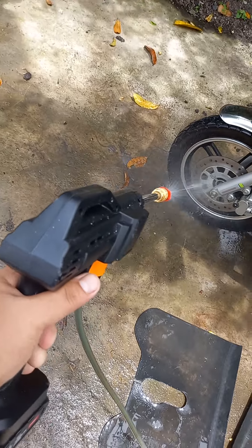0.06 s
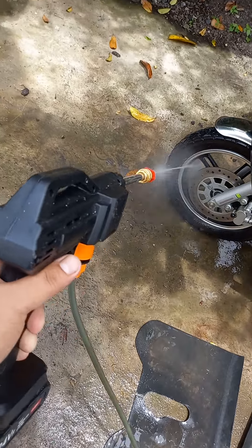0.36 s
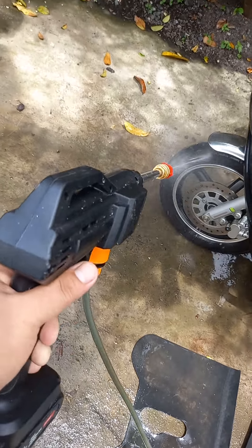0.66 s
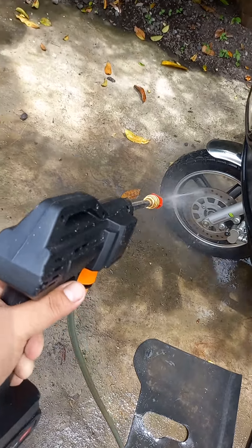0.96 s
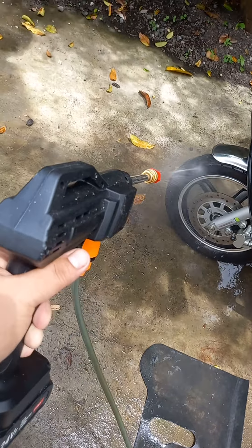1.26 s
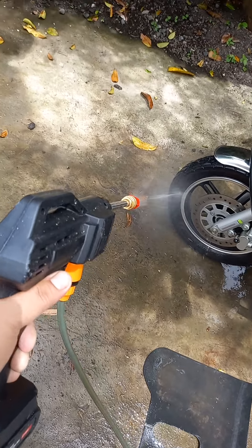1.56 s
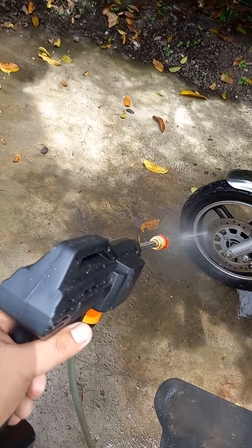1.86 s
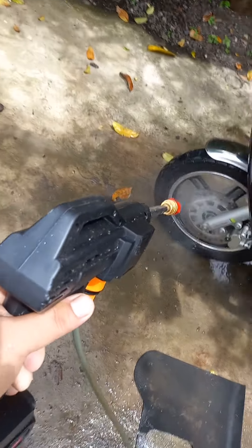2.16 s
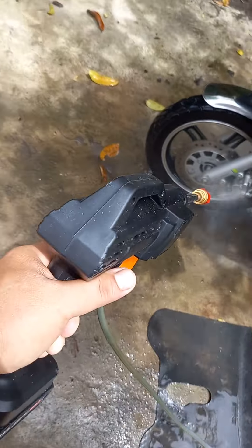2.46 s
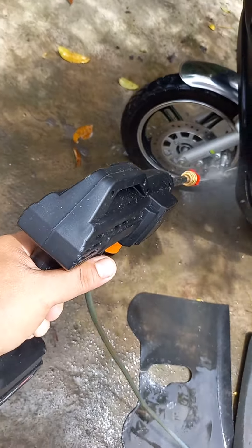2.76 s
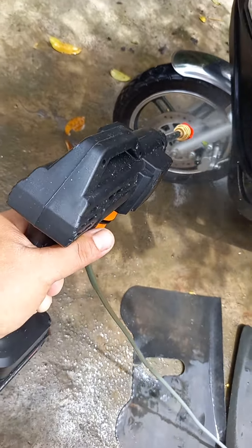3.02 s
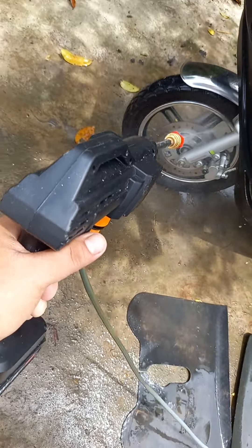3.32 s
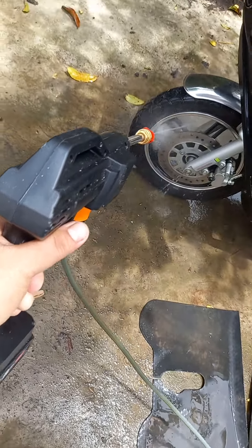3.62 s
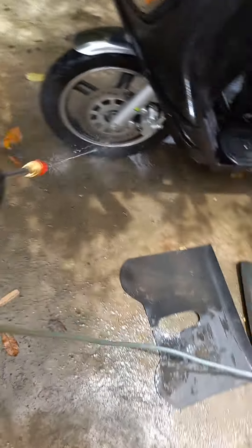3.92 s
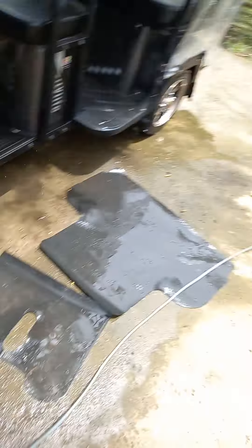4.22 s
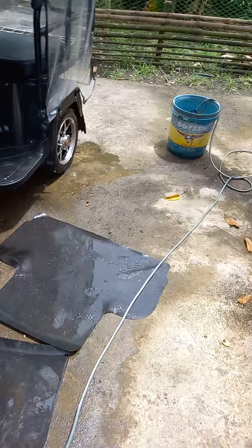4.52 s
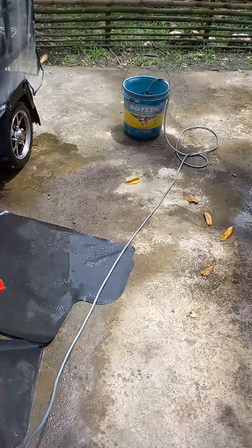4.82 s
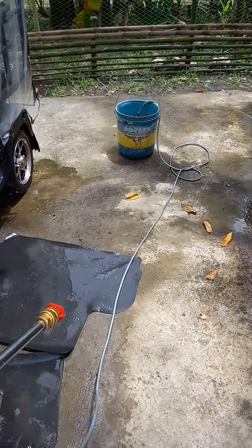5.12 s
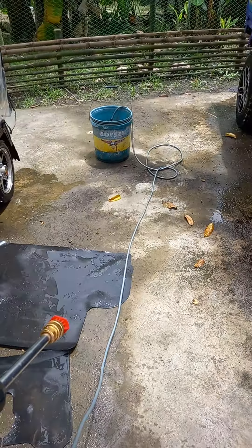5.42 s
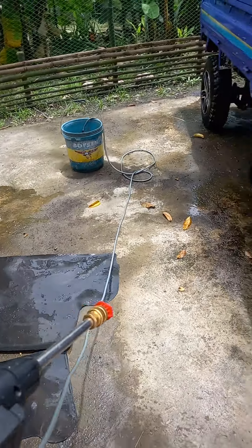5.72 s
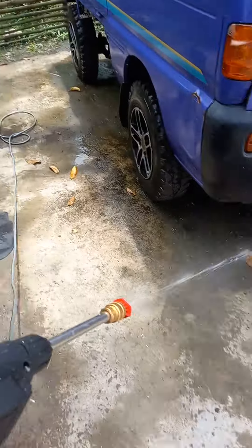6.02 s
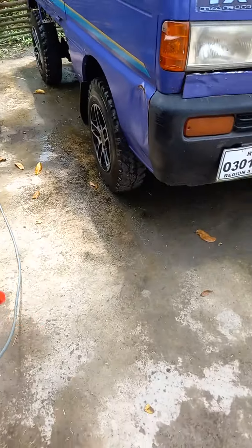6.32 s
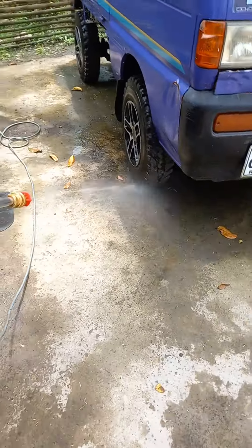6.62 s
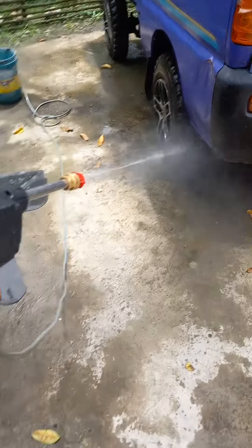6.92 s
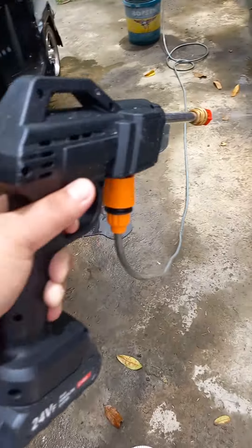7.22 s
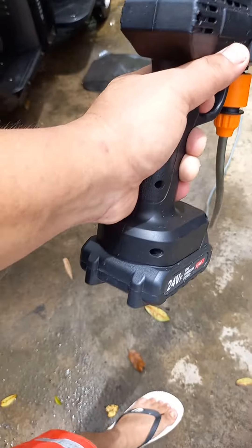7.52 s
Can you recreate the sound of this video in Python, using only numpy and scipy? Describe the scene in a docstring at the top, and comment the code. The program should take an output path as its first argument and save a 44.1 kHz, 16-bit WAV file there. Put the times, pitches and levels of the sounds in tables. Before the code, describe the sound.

A hand-held pressure washer buzzes and sprays a wheel, stops for a few scuffing steps, then restarts with a short burst and a longer one.

```python
"""A concrete yard, a stereo phone microphone close to a hand-held cordless pressure washer. First one long
pull rinses a wheel: the piston knocks the plastic housing at both ends of each crank turn, thumps the pump
head and rings a valve; the jet hisses in surges and air buffets the microphone. Near 4 s the gun runs down,
and hose and soles scrape over the wet ground to the right. Near 6 s, held another way, it starts again: a
short pull, then a long one, in which its motor vents turn to face the microphone."""
import sys
import numpy as np
from scipy import signal
from scipy.fft import rfft, irfft
from scipy.io import wavfile
from scipy.ndimage import uniform_filter1d

SR = 44100
rng = np.random.default_rng(int(sys.argv[2]) if len(sys.argv) > 2 else 0)


def to_wav(sig):
    """Store sig (one row per channel, or 1-D mono) as 16-bit WAV at the path in sys.argv[1].

    Samples outside -1..1 are clipped; the rate is SR.
    """
    pcm = np.clip(np.atleast_2d(sig), -1, 1) * 32767
    pcm = np.round(pcm).astype(np.int16)
    wavfile.write(sys.argv[1], SR, pcm.T)  # frames by channels


N = 333837
T = np.arange(N) / SR
FREQ = np.maximum(np.arange(2049) * SR / 4096, 1)

# Levels are relative, ahead of the gains in the functions.
# spectra of the quiet yard, wind on the microphone and scraped concrete: f/Hz, level/dB
YARD_SPECTRUM = [(15, -43.5), (25, -13.5), (82, -5.5), (170, -18), (249, -17.5), (463, -25.5), (1230, -37),
                 (4870, -23), (6560, -34.5), (8360, -16.5), (10500, -24), (16000, -27)]
WIND_SPECTRUM = [(20, -34.5), (45, -16.5), (70, 3), (110, -7), (250, -10.5), (500, -30)]
SCRAPE_SPECTRUM = [(180, -35), (300, -20), (470, -11.5), (555, -11.5), (1320, -3.5), (1660, 0),
                   (2700, -4.5), (3520, -5.5), (6100, -5.5), (8360, 5), (11100, -4.5), (14700, -1),
                   (16000, -11)]
# gusts on the microphone: t/s, length/s, level/dB
GUSTS = [(-.05, 0.17, -49), (1.07, 0.042, -47.5), (1.177, 0.16, -60.5), (1.418, 0.27, -56),
         (2.783, 0.25, -59), (3.932, 0.17, -60), (4.158, 0.15, -54.5)]
# low thumps of air buffeting the microphone, and a few handling bumps: t/s, level/dB, f/Hz, decay/s
THUMPS = [(0.045, -34, 74, 0.012), (0.115, -34, 68, 0.012), (1.11, -34, 85, 0.0077),
          (1.549, -33, 70.4, 0.012), (3.982, -33.5, 72.4, 0.012), (4.077, -30, 78, 0.0078),
          (4.249, -27.5, 132, 0.0027)]
# scuffs on the ground: t/s, length/s, grit level/dB, tone f/Hz, tone level/dB, left minus right/dB
SCUFFS = [(4.194, 0.14, -43.5, 1800, -55, -1.5), (4.668, 0.094, -54, 1610, -67, -3),
          (4.738, 0.14, -50, 3000, -80, -1.5), (5.014, 0.074, -63, 1790, -82, -2),
          (5.315, 0.25, -51.5, 2740, -76, -2.5), (5.469, 0.08, -43.5, 2750, -49, -2.5),
          (5.498, 0.053, -60, 940, -63, 0), (5.595, 0.092, -52, 2550, -54.5, -2),
          (5.698, 0.33, -68.5, 3700, -64.5, -5), (5.844, 0.02, -57, 2850, -45, 0)]
# grit cracking under a sole: t/s, level/dB, f/Hz, treble/dB
GRIT_CRACKS = [(5.492, -31, 2670, -24), (5.551, -26, 2600, -7), (5.592, -35, 2200, -22),
               (5.618, -29.5, 2320, -17), (5.629, -36, 2900, -13), (5.639, -38, 3000, -5),
               (5.652, -34, 2800, -5), (5.664, -34, 2400, -12), (5.682, -36, 2600, -6),
               (5.929, -40, 3000, -14)]
# trigger clicks, slow knocks of the pump and its first spit of water: t/s, level/dB, f/Hz, treble/dB
GUN_CLICKS = [(3.996, -18, 1280, -3), (4.023, -19, 1600, -5), (4.061, -26, 1600, -19),
              (4.119, -26, 1100, -7), (5.032, -44, 1860, 5), (5.911, -31, 1620, -21),
              (5.957, -17.5, 770, -3), (6.001, -12.5, 9000, -2), (6.013, -6.5, 4200, -2),
              (6.352, -20.5, 930, -8), (6.403, -16.5, 1760, 1), (6.411, -15, 1470, -7),
              (6.432, -22, 1700, -11)]
# trigger pulls: pressed t/s, released t/s, crank f/Hz, sag/(Hz/s), starting crank position/turns
PULLS = [(-1, 3.867, 41.968, .046, .092), (5.957, 6.141, 44.05, 0, .22), (6.403, 8, 42.4, .561, .751)]
# spectra of the jet, gears and loose parts, and the pump with no grip on the water: f/Hz, level/dB
JET_SPECTRUM = [(150, -9.5), (280, 1), (560, -3), (1000, 2.5), (1450, 2), (3000, 1.5), (5000, 0),
                (6600, -6), (8000, 0.5), (9300, 2), (11000, 0.5), (13500, 1.5), (15600, 0)]
CLATTER_SPECTRUM = [(200, -27), (400, 1.5), (1000, 6.5), (1550, -8), (2100, 3), (2800, -15), (5000, -16.5),
                    (6500, -23), (9000, -25)]
CHATTER_SPECTRUM = [(200, -30), (480, 6), (800, 10), (1100, 9), (1500, -0.5), (1800, 10), (2080, 3),
                    (2400, 14), (3200, -17), (3700, 6), (4200, 3.5), (4800, -0.5), (5600, -3), (9000, -23)]
# hiss as the jet wanders on and off the wheel, in the first and second hold: t/s, level/dB
HISS_1 = [(0.0, -33), (0.42, -39.5), (0.75, -34.5), (0.79, -40), (0.87, -35.5), (1.13, -39.5), (1.17, -35),
          (1.47, -33), (1.59, -36.5), (2.41, -33), (2.5, -37), (3.44, -36), (3.5, -29.5), (3.58, -41),
          (3.83, -36.5), (3.86, -37)]
HISS_2 = [(6.56, -38.5), (6.986, -36), (7.55, -37.5)]
# bright sizzling flares of the jet, on the wheel or spitting at restart: t/s, length/s, level/dB, f/Hz
FLARES = [(0.03, .06, -6, 10000), (0.11, .13, -10, 11500), (1.25, 0.11, -7, 14800),
          (2.115, 0.04, -10, 12000), (2.55, .23, -12, 12800), (2.96, .075, -5, 13600),
          (3.1, 0.04, -9, 13300), (3.18, .14, -7, 14000), (3.44, .09, -11, 12500), (6.02, .15, -7, 13000)]
# resonances of pump head, valve and housing: f/Hz, width/Hz, first hold level/dB, second hold level/dB
HEAD_MODES = [(384.6, 68, -2.5, 1), (476, 130, -3.5, 1.9), (633, 106, 0, 5.5)]
VALVE_MODES = [(796.4, 74, 6.5, -2.3), (993, 162, 1, 2), (1272, 55, -5.5, 4)]
HOUSING_MODES = [(815, 80, 1.5, -2), (987, 95.6, 3, 0.5), (1158, 180, -4.5, 1.5), (1398, 161, -7, -17),
                 (1795, 183, -10, -12.5), (2063, 205, -5.5, 1.5), (2319, 350, -9.5, -10.5),
                 (2555, 140, -27.5, -2), (2770, 1000, -18, -14), (3663, 240, -10.5, -14),
                 (4470, 590, -33.5, -11), (5024, 650, -14, -18.5), (5490, 170, -40, -13.5)]
# the gun from the microphone as the hand turns it: t/s, body level/dB, ring level/dB, rasp level/dB
GUN_LEVELS_1 = [(0.0, -26, -24.5, -31.5), (0.03, -31, -30, -35), (0.6, -30.5, -35.5, -36.5),
                (1.03, -30.5, -30, -36), (1.51, -30, -29.5, -36.5), (3.27, -30, -39, -33),
                (3.7, -31.5, -38, -34.5)]
GUN_LEVELS_2 = [(6.58, -28.5, -7, -29), (6.67, -25.5, -23, -32.5), (7.002, -25, -18, -29.5),
                (7.438, -27, -42, -30.5), (7.48, -29.5, -41, -33.5)]
# the gun at the two microphone ports, in each hold: f/Hz, left minus right/dB
BALANCE_1 = [(200, -1.5), (380, -4.5), (700, 3.5), (1290, 4.5), (2380, -4), (4400, 3)]
BALANCE_2 = [(200, -2), (380, -1.5), (700, -2), (1290, 3), (2380, -3.5), (4400, 1.5)]
# phase by which the left port leads: f/Hz, phase/rad
LEFT_LEAD = [(100, -1), (780, 1.33), (1120, 1.16), (1380, 1), (2150, 0.9), (2580, 3.5), (3360, 4),
             (4900, 5)]

SPIN_UP_S, COAST_S, RATED_HZ, STALL_HZ, DRAG_HZ = .0325, .157, 42, 4.5, 12
PRIME_S, PRIME_RISE_S, BLEED_S = 0.17, 0.079, 0.072  # pressure builds after a pull, drops on release
# without pressure the pump body is louder, rings and rasps less, and the jet spits
SLACK_BODY_DB, SLACK_RING_DB, SLACK_RASP_DB, SLACK_JET_DB = 0.5, -20, -4.5, 2.5
KNOCK_POWER, JET_POWER = 1.09, 1.28  # loudness grows with these powers of the speed
TAKE_UP_TURNS, JET_LAG_S = 0.34, 0.0068
RATTLE_DB, FLUTTER_DB, EMPHASIS_DB = -15, -14, -7.5
SIDE_ON_S, SIDE_ON_RISE_S, VENT_DB = 7.15, 0.22, -31  # the motor vents turn to the microphone


def undb(db):
    """Decibels to gain."""
    return 10 ** (np.asarray(db) / 20)


def unit(x, where=slice(None)):
    """Scale to rms 1, over the whole sound or a part of it."""
    return x / np.sqrt(np.mean(x[where] ** 2))


def curves(table):
    """The columns of a timed table at every sample."""
    times, *columns = np.transpose(table)
    return [np.interp(T, times, column) for column in columns]


def shape(points):
    """A table of f/Hz, value on the frequency grid."""
    hz, value = np.transpose(points)
    return np.interp(np.log(FREQ), np.log(hz), value)


def through(x, response):
    """Filter a sound by a frequency response."""
    taps = np.roll(irfft(response), 512)
    return signal.oaconvolve(x, taps)[512:512 + N]


def below(hz):
    """Response of a steep low-pass."""
    return 1 / (1 + (FREQ / hz) ** 14)


def resonance(hz, width):
    """A band-pass applied twice: it swells briefly, then dies away."""
    return 1 / (1 + 1j * (FREQ / hz - hz / FREQ) * hz / width) ** 2


def modes(table, hold):
    """Response of a set of resonances; neighbours swing in opposite sense."""
    return sum((-1) ** k * undb(levels[hold]) * resonance(hz, width)
               for k, (hz, width, *levels) in enumerate(table))


def noise(spectrum):
    """Noise with a given spectrum."""
    return unit(through(rng.standard_normal(N), undb(shape(spectrum))))


def walk(rate):
    """Smooth random drift with a spread near 1."""
    step = int(SR / rate)
    stairs = np.repeat(rng.standard_normal(N // step + 1), step)
    return 1.3 * uniform_filter1d(uniform_filter1d(stairs, step), step)[:N]


def grains(rate, spread_db):
    """Dense tiny impacts, a few much larger than the rest."""
    size = undb(spread_db * np.minimum(rng.exponential(size=N), 4))
    return unit((rng.random(N) < rate / SR) * size * rng.standard_normal(N))


def swell(start, length, attack_s, release_s):
    """An envelope that rises, holds and dies away."""
    return np.clip((T - start) / attack_s, 0, 1) * np.exp(-np.maximum(T - start - length, 0) / release_s)


def fade(blows, decay_s):
    """An envelope that jumps at each blow and dies away."""
    return signal.lfilter([1], [1, -np.exp(-1 / (decay_s * SR))], blows)


def pan(db):
    """Gains of the two channels for a level of left minus right."""
    return undb(np.array([[db], [-db]]) / 2)


def yard(level_db=-65):
    """The quiet of the yard, all around the microphone."""
    return undb(level_db) * np.array([noise(YARD_SPECTRUM), noise(YARD_SPECTRUM)])


def wind(calm_db=-73, draught_db=-54, gain_db=7.5, apart=0.34):
    """The draught of the running gun and a few gusts buffet the microphone."""
    gusts = sum(undb(db) * swell(start, length, attack_s=0.053, release_s=0.024)
                for start, length, db in GUSTS)
    flow = undb(calm_db) + undb(draught_db) * motor(PULLS)[0] + gusts
    rumble = noise(WIND_SPECTRUM) + apart * noise(WIND_SPECTRUM) * np.array([[1], [-1]])
    return flow * undb(gain_db + 2 * walk(14)) * rumble


def thumps():
    """Air buffeting the microphone, and a few handling bumps: low swings that die within a few cycles."""
    out = np.zeros(N)
    for start, db, hz, decay_s in THUMPS:
        age = np.maximum(T - start, 0)
        out += undb(db) * age / decay_s * np.exp(1 - age / decay_s) * np.sin(2 * np.pi * hz * age)
    return out


def scraping(high_db=-1, left_lag_s=.0004):
    """Hose and soles drag over gritty wet concrete, to the right; each scuff has its own hollow tone."""
    colour = undb(shape(SCRAPE_SPECTRUM))
    direct = grains(rate=8500, spread_db=2)
    out = np.zeros((2, N))
    for channel, lag, side in zip(out, (left_lag_s, 0), (1, -1)):
        grit = np.roll(direct, int(lag * SR)) + grains(rate=9000, spread_db=4)
        rub = unit(through(grit, colour * below(5540)))
        rub += undb(high_db) * unit(through(grit, colour * (1 - below(4700))))
        for start, length, grit_db, hz, tone_db, pan_db in SCUFFS:
            envelope = swell(start, length, attack_s=0.035, release_s=0.026)
            hollow = unit(through(grit, resonance(hz, 0.4 * hz)))
            channel += envelope * undb(side * pan_db / 2) * (undb(grit_db) * rub + undb(tone_db) * hollow)
    return out * undb(2 * walk(45))


def clicks(table, decay_s, width, gain_db, pan_db, snap_db=-2):
    """Small impacts: a noise burst through one resonance, with a bright snap."""
    out, t = np.zeros((2, N)), T[:4096]
    for start, db, hz, treble_db in table:
        burst = (rng.standard_normal(len(t)) + .5 * rng.standard_normal((2, len(t)))) * np.exp(-t / decay_s)
        snap = undb(treble_db + snap_db) * resonance(7900, 9800)
        click = irfft(rfft(burst) * (resonance(hz, width * hz) + snap))
        i = int(start * SR)
        out[:, i:i + len(t)] += undb(db + gain_db) * click / abs(click).max()
    return out * pan(pan_db)


def motor(pulls):
    """Speed (1 = rated), crank turns and water pressure (0-1): a pull spins up, a release coasts."""
    hz, turn, pressure = np.zeros((3, N))
    for pressed, released, top_hz, sag, position in pulls:
        now = T >= pressed
        age, coast = T[now] - pressed, np.maximum(T[now] - released, 0)
        hz[now] = (top_hz - sag * age) * (1 - np.exp(-age / SPIN_UP_S)) * np.exp(-coast / COAST_S)
        turn[now] = position + np.cumsum(hz[now]) / SR
        pressure[now] = np.clip((age - coast - PRIME_S) / PRIME_RISE_S, 0, 1) * np.exp(-coast / BLEED_S)
    turning = np.clip((hz - STALL_HZ) / (DRAG_HZ - STALL_HZ), 0, 1)  # the last slow strokes die out
    return turning * hz / RATED_HZ, turn, pressure


def jet_spray(knocks, steady, hiss_db, tilt_db, sizzle_db, right_lag_s=.00045):
    """Droplets surge out after each stroke; the harder the surface they hit, the brighter they hiss."""
    usual_db = hiss_db[steady].mean()
    hard_db = hiss_db - usual_db
    low_gain = undb(0.17 * hard_db)
    hiss_gain = undb(hard_db + walk(19))
    sizzle_gain = undb(1.23 * hard_db + sizzle_db + 1.1 * walk(14))
    flares = [(undb(db) * swell(start, length, attack_s=0.0083, release_s=0.006), resonance(hz, 3200))
              for start, length, db, hz in FLARES]
    spatter = undb(2.3 * walk(70))
    surge = unit(1 + 1.64 * fade(knocks, decay_s=0.0024), steady) * undb(1.1 * walk(30))
    colour = undb(shape(JET_SPECTRUM) + tilt_db * np.log2(FREQ / 9000))
    common, out = 0.59 * grains(rate=22000, spread_db=1.5), []
    for lag in (0, right_lag_s):
        impacts = np.roll(common, int(lag * SR)) + grains(rate=22000, spread_db=3)
        drops = unit(through(impacts, colour))
        low, sizzle = through(drops, below(6000)), through(drops, 1 - below(10900))
        hiss = drops - low - sizzle
        flaring = sum(envelope * unit(through(drops, abs(band))) for envelope, band in flares)
        out.append(low_gain * low + hiss_gain * hiss + sizzle_gain * sizzle + spatter * flaring)
    return np.array(out) * surge * undb(usual_db)


def groan(speed, turn, cycles_per_turn=18, gain_db=-0.5):
    """While the motor gathers speed its gears groan through the pump head, rising in pitch."""
    strain = (np.gradient(speed) > 0) * np.clip(1 - speed, 0, 1) * speed ** 3
    tone = strain * np.sin(2 * np.pi * cycles_per_turn * turn)
    return undb(gain_db) * through(tone, abs(resonance(510, 210)))


def teeth(turn, count=400):
    """Roughness of a gear: the same bumps pass on every turn."""
    return np.interp(turn % 1 * count, np.arange(count), rng.standard_normal(count))


def clatter(turn, shake, steady, gear_db):
    """Gear teeth rasp alike on every turn; loose parts add a flutter that repeats every second turn."""
    colour = undb(shape(CLATTER_SPECTRUM))
    gears = through(teeth(turn), colour * (1 - below(2440)))
    flutter = through(teeth(turn) * np.cos(np.pi * turn), colour)
    return undb(gear_db) * unit(gears * shake, steady) + undb(FLUTTER_DB) * unit(flutter * shake, steady)


def strokes(turn, scatter_db, jitter_s):
    """One blow at each whole turn, each a little early or late, weak or strong."""
    at = np.flatnonzero(np.diff(np.floor(turn)) > 0)
    timing, strength = rng.standard_normal((len(at), 2)).T
    at += np.round(timing * jitter_s * SR).astype(int)
    blows = np.zeros(N)
    blows[np.clip(at, 0, N - 1)] = undb(scatter_db * strength)
    return blows


def piston(turn, hold):
    """The knocks at both ends of the piston's travel, and the ringing of housing, head and valve."""
    limp = undb(0.11 * np.cos(np.pi * turn))  # every second turn strikes a little harder
    push = limp * strokes(turn, scatter_db=.2, jitter_s=.00001)
    back = strokes(turn - .474, scatter_db=.9, jitter_s=.000012)
    valve = strokes(turn - .704, scatter_db=.7, jitter_s=.000012)
    knocks = push + undb(-1.5) * back
    struck = through(knocks, modes(HOUSING_MODES, hold))
    struck += through(push, modes(HEAD_MODES, hold))
    struck += through(valve, modes(VALVE_MODES, hold))
    emphasis = undb(EMPHASIS_DB) * resonance(1007, 60)  # a narrow emphasis of the pump's tone near 1 kHz
    return knocks, through(struck, 1 + emphasis)


def tip_forward(body, start_s=2.3, rise_s=0.35, ring_db=1.5, rest_db=-0.5):
    """The gun tips over the wheel and the ring of its valve stands out of the pump body."""
    tipped = np.clip((T - start_s) / rise_s, 0, 1)
    valve_ring = through(body, abs(resonance(975, 170)))
    return undb(ring_db * tipped) * valve_ring + undb(rest_db * tipped) * (body - valve_ring)


def washer(pulls, levels, hiss, balance, hold, body_db, ring_db, rasp_db, gear_db, chatter_db, hum_db,
           jet_db, jet_pan_db, jet_tilt_db, sizzle_db):
    """The gun close to the microphone, in hold 0 or 1: the piston pump and the jet that it drives."""
    speed, turn, pressure = motor(pulls)
    steady, slack = pressure > .5, 1 - pressure
    take_up = 1 - np.exp(-np.maximum(turn, 0) / TAKE_UP_TURNS)  # the first stroke takes up the play
    force = speed ** KNOCK_POWER * take_up
    body_gain, ring_gain, rasp_gain = (
        force * undb(db + slack * change)
        for db, change in zip(curves(levels), (SLACK_BODY_DB, SLACK_RING_DB, SLACK_RASP_DB)))
    knocks, struck = piston(turn, hold)
    shake = fade(knocks, decay_s=0.00086) + 1.5
    pulses = fade(knocks, decay_s=0.0024) + 0.14
    pump = unit(struck, steady) + clatter(turn, shake, steady, gear_db)
    chatter = undb(chatter_db) * force * slack * unit(noise(CHATTER_SPECTRUM) * pulses, steady)
    labouring = chatter + groan(speed, turn)
    vent_gain = undb(VENT_DB) * force * np.clip((T - SIDE_ON_S) / SIDE_ON_RISE_S, 0, 1)
    ring_gain *= undb(walk(6))  # the ring wavers with the load
    # pump body, housing ring and high rasp each radiate in their own direction
    bands = below(1864), below(2860) - below(1760), 1 - below(2420)
    ports = []
    for side in (1, -1):
        rattle = undb(RATTLE_DB) * unit(noise(CLATTER_SPECTRUM) * shake, steady)
        body, ring, rasp = (unit(through(pump + rattle, band), steady) for band in bands)
        if hold == 0:
            body = tip_forward(body)
        vents = unit(through(rng.standard_normal(N) * pulses, resonance(3000, 1040)), steady)
        machine = (undb(body_db) * body_gain * body + undb(ring_db) * ring_gain * ring
                   + undb(rasp_db) * rasp_gain * rasp + labouring + vent_gain * vents)
        to_port = undb(side * shape(balance) / 2) * np.exp(.5j * side * shape(LEFT_LEAD))
        ports.append(through(machine, to_port))
    jet = jet_spray(knocks, steady, curves(hiss)[0], jet_tilt_db, sizzle_db)
    jet *= undb(jet_db + SLACK_JET_DB * slack) * np.interp(T - JET_LAG_S, T, speed) ** JET_POWER
    # the piston shakes the whole gun twice a turn
    hum = np.sin(4 * np.pi * turn) + 0.3 * np.sin(8 * np.pi * turn) + 0.45 * np.sin(12 * np.pi * turn)
    return np.array(ports) + jet * pan(jet_pan_db) + undb(hum_db) * hum * body_gain * speed ** 2


def scene():
    """One long pull at the wheel, a few steps, then two pulls with the gun held another way."""
    rinse = washer(PULLS[:1], GUN_LEVELS_1, HISS_1, BALANCE_1, hold=0,
                   body_db=1.5, ring_db=1.14, rasp_db=2, gear_db=-9, chatter_db=-25, hum_db=-12,
                   jet_db=10, jet_pan_db=3, jet_tilt_db=0.1, sizzle_db=-1)
    restarts = washer(PULLS[1:], GUN_LEVELS_2, HISS_2, BALANCE_2, hold=1,
                      body_db=0.5, ring_db=-7.5, rasp_db=1.5, gear_db=-12, chatter_db=-22.5, hum_db=-16,
                      jet_db=11, jet_pan_db=2, jet_tilt_db=-0.5, sizzle_db=-4.5)
    gun_clicks = clicks(GUN_CLICKS, decay_s=0.0034, width=1.65, gain_db=-2, pan_db=-3)
    grit = clicks(GRIT_CRACKS, decay_s=0.0037, width=.7, gain_db=0, pan_db=-5)
    return rinse + restarts + gun_clicks + grit + scraping() + thumps() + wind() + yard()


def record(dry):
    """The phone cuts the rumble below 38 Hz and the top above 15.8 kHz."""
    sound = signal.sosfilt(signal.butter(3, 38, "high", fs=SR, output="sos"), dry)
    return signal.sosfilt(signal.ellip(10, .1, 70, 15800, fs=SR, output="sos"), sound)


dry = scene()
out = record(dry)
to_wav(out)
```